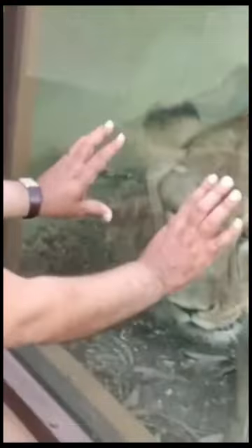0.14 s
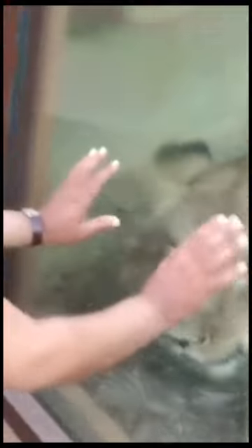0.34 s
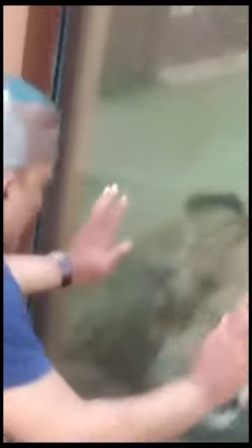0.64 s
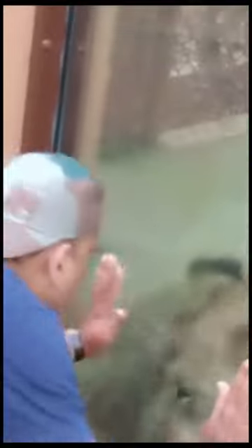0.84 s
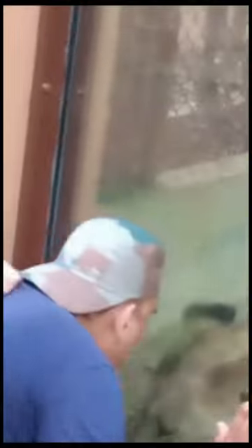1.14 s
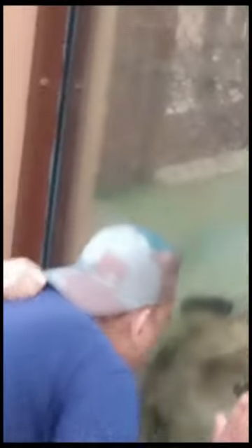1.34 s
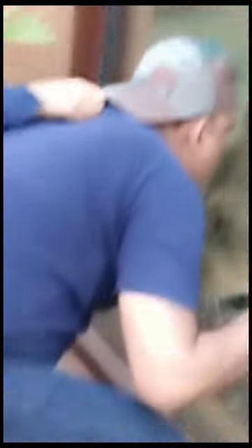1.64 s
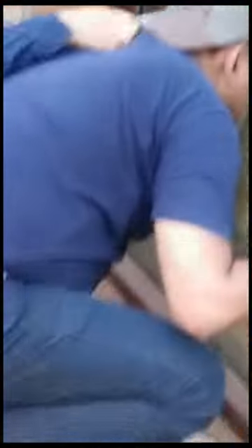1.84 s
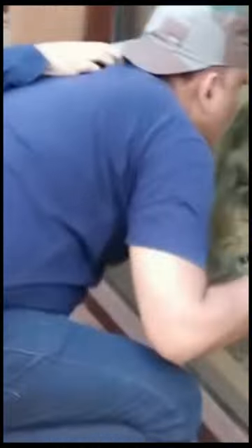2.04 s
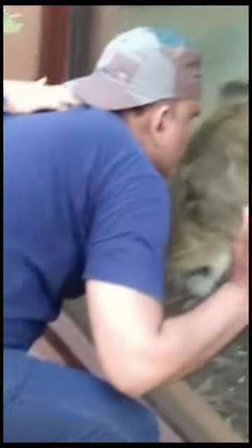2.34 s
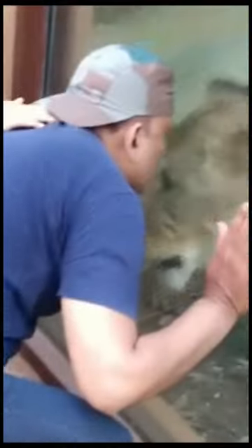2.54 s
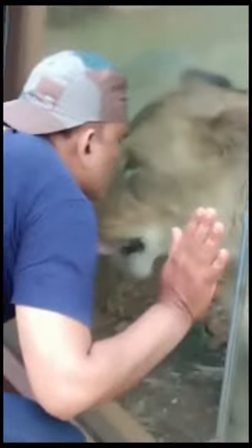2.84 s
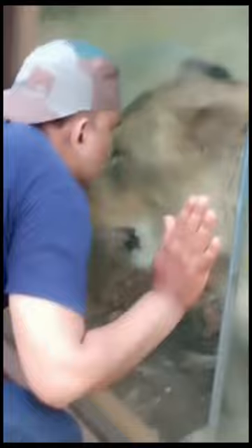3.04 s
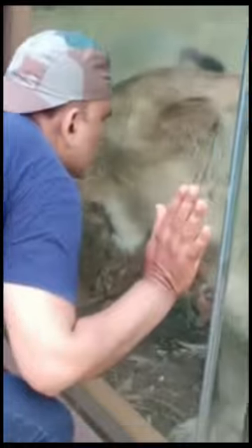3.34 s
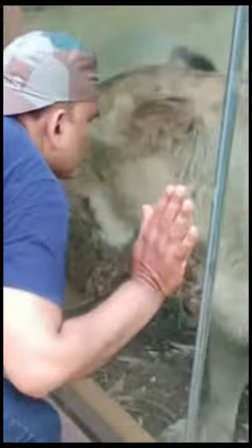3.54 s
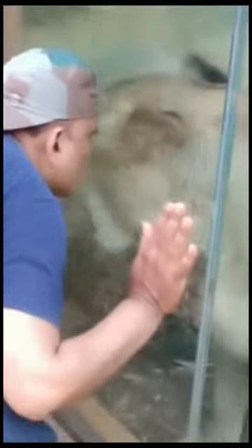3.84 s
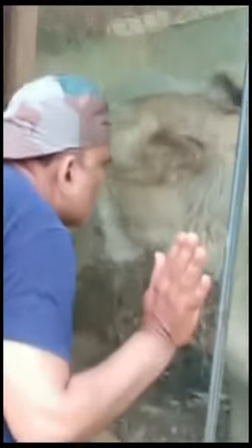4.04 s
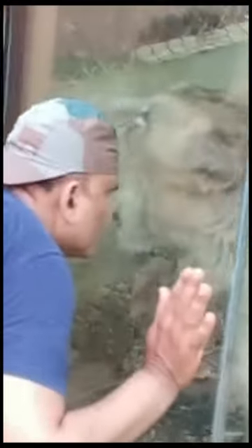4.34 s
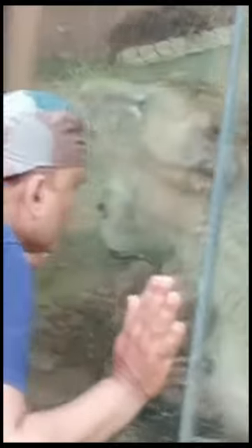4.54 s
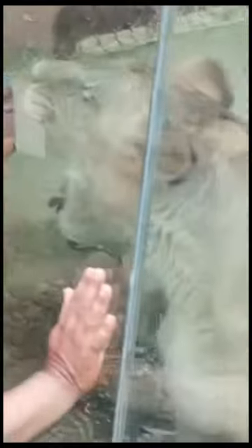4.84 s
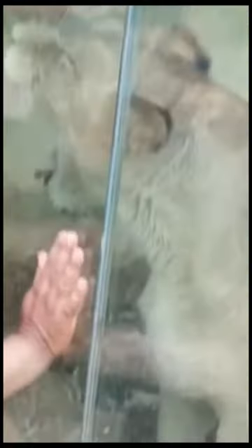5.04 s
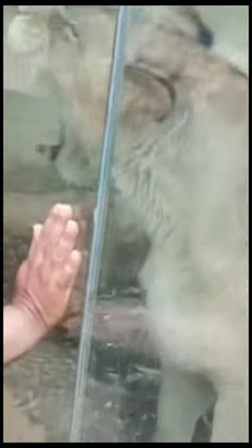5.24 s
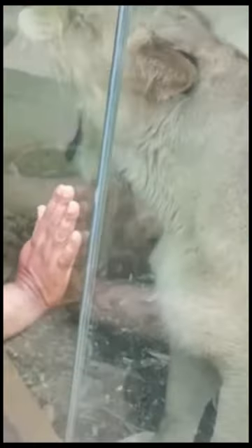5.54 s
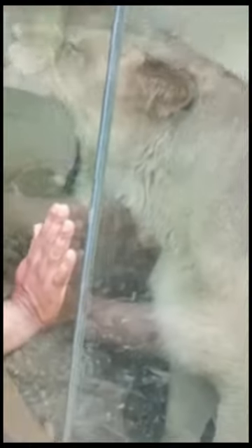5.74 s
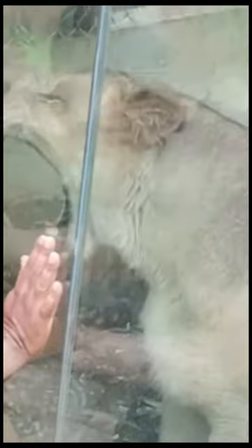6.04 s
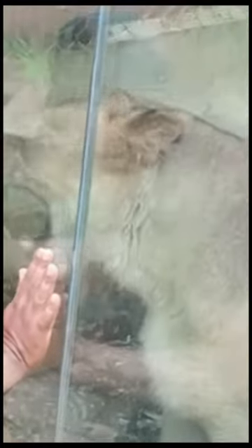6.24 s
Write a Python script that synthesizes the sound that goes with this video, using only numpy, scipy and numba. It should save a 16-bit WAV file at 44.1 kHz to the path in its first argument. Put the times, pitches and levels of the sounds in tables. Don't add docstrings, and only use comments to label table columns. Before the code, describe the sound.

A lion grunts loudly in steady rhythm, hooting then growling and gradually tiring, while birds chirp, a crow caws twice and the glass bumps softly.

```python
import sys
import numpy as np
from scipy import signal
from scipy.io import wavfile
from scipy.ndimage import uniform_filter1d
from numba import njit

SR = 44100
rng = np.random.default_rng(int(sys.argv[2]) if len(sys.argv) > 2 else 0)


def how_loud(loudness_db):
    steps = np.asarray(loudness_db, float) / 20
    return 10 ** steps


def transcribe(u):
    v = np.clip(np.atleast_2d(u).T, -1, 1)
    q = np.round(v * 32767).astype(np.int16)
    wavfile.write(sys.argv[1], SR, q)


N = 281799

# [start t/s, voice breaks t/s, folds stop t/s, shelter falls silent t/s, pitch f/Hz]
GRUNTS = [
    (-.1, .3, .5, .66, 158),
    (.825, 1.12, 1.349, 1.47, 155.5),
    (1.68, 1.96, 2.178, 2.37, 155),
    (2.605, 2.88, 3.083, 3.27, 155),
    (3.485, 3.631, 3.921, 4.1, 156),
    (4.315, 4.473, 4.69, 4.88, 150),
    (5.12, 5.284, 5.49, 5.68, 149.5),
    (5.935, 6.12, 6.3, 6.47, 150),
]
# [roughness 0-1, throat ring f/Hz, ring level/dB, starting share of the pitch]
BREAKS = [(0.499, 405.5, 1.5, 0.92), (0.501, 385, -1.5, 0.96), (.5, 388.6, 0, .94), (0.499, 386, 0, .92),
          (0.701, 383.4, 1.5, .91), (0.702, 374, -1.5, .91), (.7, 384, -1, .94), (.7, 375.4, 1.5, .94)]
# hoot level/dB [as the mouth opens, at full effort, at the break, as the folds stop], growl crest level/dB
EFFORT = [(-11.5, -2.5, -2, -24, -11.5), (-8, 1.5, -3.5, -25, -13.5), (-7.5, -0.5, -5, -22.5, -13),
          (-6.5, -2, -3.5, -24.5, -14), (-5.5, -6, -9, -24.5, -17.5), (-5, -5, -7, -27, -19.5),
          (-7, -5.5, -6.5, -26, -19.5), (-6, -6.5, -6.5, -26, -20.5)]
# [crest t/s, tires t/s, breath level/dB, share of the hoot's fall done halfway to the stop]
FLOW = [(-.04, 0.305, -34, .45), (1.007, 1.167, -35, 0.58), (1.831, 2.047, -36.5, 0.56),
        (2.745, 2.947, -36.5, 0.6), (3.641, 3.795, -39, .25), (4.464, 4.616, -41, .4),
        (5.274, 5.417, -40, .35), (6.074, 6.201, -40.5, 0.29)]
HUSH_S = .06


def unit(x):
    return x / np.sqrt(np.mean(x ** 2))


def play(tables, column, off):
    t = np.arange(N) / SR
    out = np.full(N, float(off))
    for rows in tables:
        rows = np.array(rows, float)
        on = (t >= rows[0, 0]) & (t <= rows[-1, 0])
        out[on] = np.interp(t[on], rows[:, 0], rows[:, column])
    return out


def gain(tables, column, size):
    return uniform_filter1d(how_loud(play(tables, column, -120)), size)


def walk(rate):
    k = int(SR / rate)
    held = np.repeat(rng.standard_normal(N // k + 1), k)
    return 1.3 * uniform_filter1d(uniform_filter1d(held, k), k)[:N]


def pair(x, pan_db):
    return x * how_loud(np.array([[.5], [-.5]]) * pan_db)


@njit
def svf(x, hz, width):
    y, b, l = np.empty(len(x)), 0., 0.
    g, k = np.tan(np.pi * hz / SR), width / hz
    for i in range(len(x)):
        v = (b + g * (x[i] - l)) / (1 + g * (g + k))
        b, l, y[i] = 2 * v - b, l + 2 * g * v, k * v
    return y


@njit
def glide(x, hz, width):
    y, b, l = np.empty(len(x)), 0., 0.
    for i in range(len(x)):
        g, k = np.pi * hz[i] / SR, width / hz[i]
        v = (b + g * (x[i] - l)) / (1 + g * (g + k))
        b, l, y[i] = 2 * v - b, l + 2 * g * v, k * v
    return y


def tract(x, modes):
    total = 0
    for k, (hz, width, db) in enumerate(modes):
        mode = svf(svf(x, 1. * hz, 1.88 * width), 1. * hz, 1.88 * width)
        total = total + (-1) ** k * how_loud(db) * mode
    return unit(total)


@njit
def folds(hz, rough, stretch, size):
    pulses, phase, p, k = np.zeros(len(hz) + 1), np.empty(len(hz)), 0., 0
    for i in range(len(hz)):
        step = hz[i] * np.exp(rough[i] * stretch[k]) / SR
        p += step
        if p >= 1:
            p, k = p - 1, k + 1
            a = np.exp(rough[i] * size[k])
            pulses[i] += a * p / step
            pulses[i + 1] += a * (1 - p / step)
        phase[i] = p
    return pulses[:-1], phase


def air():
    # [f/Hz, level/dB per Hz]
    colour = [(12, -37), (20, -16), (90, -15.5), (160, -0.5), (231, -26), (391, -22.5), (565, -28),
              (884, -24.5), (1420, -32), (4640, -36), (10800, -45), (14000, -77), (22000, -120)]
    # [f/Hz, level/dB]; machine hum at 65 Hz, the shelter's low note and the pane's note ringing
    steady_tones = [(65, -48.5), (156, -55), (760, -67.5)]
    hiss, swell = 0, walk(0.2)
    f, d = np.transpose(colour)
    for hz in 25 * 2 ** np.arange(0, 8.8, .5):
        mid, side = (svf(svf(rng.standard_normal(N), hz, hz / 2), hz, hz / 2) for _ in range(2))
        db = np.interp(np.log(hz), np.log(f), d) + 0.45 * swell + 1.4 * walk(3.8)
        spread = .6 if hz < 3000 else .9 if hz < 6000 else .25
        hiss = hiss + how_loud(db) * (mid + spread * side * np.array([[1], [-1]]))
    t = np.arange(N) / SR
    hum = sum(how_loud(db + 3 * walk(6)) * np.sin(2 * np.pi * hz * t) for hz, db in steady_tones)
    return unit(hiss) * how_loud(-42) + hum


def notes(rows, bend, flutter):
    edge_db = (-5.5, 0, 0, 0, -5.5)
    return [[(s + u * length, a + c * (b - a), db + e, flutter)
             for u, c, e in zip(np.linspace(0, 1, 5), bend, edge_db)] for s, length, a, b, db in rows]


def birds():
    # [t/s, length/s, from f/Hz, to f/Hz, level/dB]; thin straight glides
    glides = [(.44, .03, 3100, 4550, -56), (.555, 0.049, 3220, 3927, -57.5), (.84, .035, 4240, 3400, -56.5),
              (1.46, .04, 2420, 2400, -59.5), (2.28, .035, 3450, 4500, -58), (4.875, .09, 5400, 4550, -53),
              (5.272, 0.035, 5800, 3500, -48.5), (5.31, .04, 3500, 4645, -52.5),
              (5.7, .025, 6400, 6930, -56.5), (5.812, 0.048, 3280, 4200, -57),
              (6.19, .025, 4080, 3920, -54), (6.352, .04, 5800, 5110, -59)]
    arches = [
        (4.7, .03, 3580, 4300, -56.5),
        (4.83, 0.032, 5790, 6830, -59),
        (5.71, .068, 3340, 4550, -54),
        (6.32, .032, 5900, 6780, -57.5),
    ]
    trills = [(.475, .075, 4396, 4490, -56.5), (.915, .03, 5350, 5240, -49.5),
              (1.4, .03, 2950, 2608, -58.5), (2.312, .11, 4500, 4610, -54.5),
              (4.245, .055, 4740, 4300, -55.5), (4.73, .08, 3470, 2996, -55), (5.14, .04, 4556, 4080, -59),
              (5.93, .03, 4000, 4800, -54), (5.96, .1, 4780, 4780, -59), (6.24, .06, 3316, 2870, -55)]
    line = np.linspace(0, 1, 5)
    thin, blurred = .01, .05
    song = notes(glides, line, thin) + notes(arches, np.abs(np.sin(np.pi * line)) ** .5, thin)
    song = song + notes(trills, line, blurred)
    hz = play(song, 1, 4000) * (1 + play(song, 3, 0) * walk(400))
    whistle = np.sqrt(2) * np.sin(2 * np.pi * np.cumsum(hz) / SR)
    whistle = whistle * how_loud(2.5 * walk(120)) * gain(song, 2, size=200)
    echoes = 0.26 * np.roll(whistle, 330) + 0.22 * np.roll(whistle, 710) + 0.12 * np.roll(whistle, 1270)
    return 1.1 * whistle + echoes


def crow():
    # [t/s, length/s, pitch f/Hz, level/dB]
    calls = [
        (3.287, .31, 409.8, -46.5),
        (3.917, .34, 411, -46),
    ]
    # [f/Hz, width/Hz, level/dB]
    beak = [(1220, 230, 0), (1630, 300, -4.5), (1990, 260, 0), (2820, 280, -7), (6450, 1700, -13.5)]
    edge_db = -12.5
    caws = [[(s, .94 * f, db + edge_db), (s + .3 * d, f, db), (s + .73 * d, 1.01 * f, db),
             (s + d, .86 * f, db + edge_db)] for s, d, f, db in calls]
    chance = rng.standard_normal((N // 50, 2)).T
    pulses, phase = folds(play(caws, 1, 400), np.full(N, .3), .14 * chance[0], chance[1])
    hiss = rng.standard_normal(N) * np.exp(-phase / .4)
    return tract(unit(pulses) + 2.0 * hiss, beak) * how_loud(2.5 * walk(30)) * gain(caws, 2, size=441)


def bumps():
    # [t/s, peak level/dB, f/Hz]
    knocks = [
        (4.272, -34.5, 254),
        (5.07, -31.5, 263.9),
    ]
    t = np.arange(N) / SR
    total = 0
    for s, db, hz in knocks:
        decay = (t > s) * np.exp(-np.abs(t - s) / 0.0156)
        total = total + how_loud(db) * decay * np.sin(2 * np.pi * hz * (t - s))
    return total


@njit
def walls(x, lags, keep, damp):
    line, soft, out = np.zeros((8, 4096)), np.zeros(8), np.zeros((2, len(x)))
    for i in range(len(x)):
        total = 0.
        for k in range(8):
            soft[k] += (1 - damp) * (keep[k] * line[k, (i - lags[k]) & 4095] - soft[k])
            total += soft[k]
            out[k % 2, i] += soft[k]
        for k in range(8):
            line[k, i & 4095] = x[i] + soft[k] - total / 4
    return out


def room(x):
    t60_s = 0.45
    lags = rng.integers(500, 2600, 8)
    return how_loud(-11) * walls(x, lags, how_loud(-60 * lags / SR / t60_s), 0.34)


def pane(growl):
    freed = np.clip((np.arange(N) / SR - 3.2) / 1.5, 0, 1)
    glass = how_loud(10) * svf(growl, 765., 10.) * freed
    return glass + svf(growl, 317.6, 7.)


def arc(crest_db, late, open_db, tire_db, stop_db):
    curves = []
    for (s, _, b, _, _), (top, tired, _, _), db in zip(GRUNTS, FLOW, crest_db):
        curves.append([(s, db - 45), (s + 0.047, db + open_db), (top + late * (tired - top), db),
                       (tired, db + tire_db), (.5 * (tired + b), db + 0.69 * stop_db),
                       (b, db + stop_db), (b + 0.093, db + stop_db - 21.5)])
    return gain(curves, 1, size=800)


def hoot_shape():
    # [t/s, depth level/dB]
    catches = [(0.325, 8), (.385, 21.5), (.445, 9), (.502, 8), (.612, 10), (1.15, 8.5), (1.21, 6),
               (1.27, 5.5), (1.99, 5.5), (2.156, 7), (2.746, 8.5), (2.892, 6), (2.998, 21), (3.644, 10),
               (3.78, -2), (3.831, 10), (3.905, 14), (4.488, 12.5), (4.548, 1.5), (4.593, 3), (4.685, 16),
               (4.73, 8), (5.318, 4.5), (5.46, 11), (5.547, 9), (6.13, 6.5), (6.189, 18), (6.217, 6),
               (6.31, 7)]
    swell_s, open_s, tight_s = .03, 0.077, .12
    voice_pan_db, stop_pan_db, ring_pan_db = 6.5, 4.5, -10.5
    pitch, level, side = [], [], []
    for (s, a, b, end, f), (opened, full, broke, stop, _), (rough, _, _, low), (_, tired, _, fall) in zip(
            GRUNTS, EFFORT, BREAKS, FLOW):
        note = f + .6 * (155.6 - f)
        sagged = f * (1 - .1 * rough ** 2)
        pitch.append([(s, f * low), (s + swell_s, f * low), (s + tight_s, f), (tired, f),
                      (tired + .045, sagged), (b, note), (end + HUSH_S, note)])
        level.append([(s, opened - 45), (s + swell_s, opened - 14), (s + open_s, opened),
                      ((s + open_s + a) / 2, full), (a, broke), ((a + b) / 2, broke + fall * (stop - broke)),
                      (b, stop), (end, stop - 11.5), (end + HUSH_S, stop - 35)])
        side.append([(s, voice_pan_db), (b - .13, voice_pan_db), (b, stop_pan_db), (end + HUSH_S, ring_pan_db)])
    t = np.arange(N) / SR
    dips = sum(db * np.exp(-((t - s) / .014) ** 2) for s, db in catches)
    hz = uniform_filter1d(play(pitch, 1, 150), size=882)
    return hz, gain(level, 1, size=400) * how_loud(-dips), play(side, 1, 0)


def fold_shape():
    # t/s, roughness, throat ring f/Hz, ring level/dB, pitch share
    shape = []
    for (s, a, b, end, _), (r, f, db, _) in zip(GRUNTS, BREAKS):
        shape.append([(s, .06, f, db - 21.5, .96), (s + .04, .06, f, db - 8, .96), (s + .11, .17, f, db, 1.0),
                      (a - .045, .3, f, db, 1.0), (a - .015, r, f, db, 1.0), (b, r, .95 * f, db - 13.0, .9),
                      (b + 0.032, .1, f, db - 18.5, .9), (end + HUSH_S, .1, f, db - 24, .9)])
    return play(shape, 1, 0), play(shape, 2, 260), play(shape, 3, 0), play(shape, 4, 1)


def hoot_voice(hz, share, rough, pulses):
    # [f/Hz, width/Hz, level/dB]
    chest = [(66.4, 33.4, -3), (116.6, 27.8, 1.5), (191.5, 54, -11)]
    sway = share ** .12 + 0.015 * rough * walk(45)
    tone = np.sqrt(2) * np.sin(2 * np.pi * np.cumsum(hz * sway) / SR) * how_loud(1.5 * rough * walk(70))
    return tone + rough ** 2 * tract(pulses, chest)


def growl_voice(pulses, phase, rough, ring_hz, ring_db):
    # [f/Hz, width/Hz, level/dB]
    throat = [(68.6, 120, -15), (118, 34, 1.5), (208.4, 39, 7), (348, 79, -3.5), (459, 180, -2),
              (548.6, 153, -3.5), (774.6, 28, -13), (1044, 107, -19)]
    rasp = rng.standard_normal(N) * (.08 + rough) * (.6 + np.exp(-phase / .5))
    ring = unit(glide(glide(rng.standard_normal(N), ring_hz, 40.), ring_hz, 40.))
    growl = tract(unit(pulses) + 0.86 * rasp, throat) + how_loud(ring_db) * ring
    crest_db = np.array(EFFORT)[:, 4]
    return growl * how_loud(-4.5) * arc(crest_db, late=.1, open_db=-6.5, tire_db=-6.5, stop_db=-27.5)


def breath_voice(phase):
    # [f/Hz, width/Hz, level/dB]
    mouth = [(1170, 230, 3.5), (2244, 466, -4), (3210, 560, -14.5), (4300, 540, -15.5), (5460, 610, -14),
             (7670, 1100, -20), (10600, 1000, -31.5)]
    gate = (1.4 + np.exp(-phase / 0.32)) * how_loud(1.3 * walk(25))
    hiss = np.array([tract(gate * rng.standard_normal(N), mouth) for _ in range(3)])
    breath = (hiss[0] + 0.75 * hiss[1:]) * how_loud(-1.0)
    return breath * arc(np.array(FLOW)[:, 2], late=.4, open_db=-9, tire_db=-5.5, stop_db=-24.5)


def lion():
    hz, loud, pan_db = hoot_shape()
    rough, ring_hz, ring_db, share = fold_shape()
    chance = rng.standard_normal((N // 50, 2)).T
    pulses, phase = folds(hz * share, rough, .16 * chance[0], .35 * chance[1])
    hoot = pair(hoot_voice(hz, share, rough, pulses) * loud, pan_db)
    return hoot, growl_voice(pulses, phase, rough, ring_hz, ring_db), breath_voice(phase)


def scene():
    hoot, growl, breath = lion()
    outside = birds() + crow()
    reverb = room(growl + breath[0] + 1.6 * outside)
    shelter = growl + pane(growl) + bumps() + reverb
    return hoot + pair(shelter, 5.4) + pair(breath, 6.5) + pair(outside, 0.3) + pair(air(), 0.7)


def band_limit(x):
    return signal.sosfilt(signal.butter(12, 15800, fs=SR, output="sos"), x)


def record(dry):
    cut = signal.sosfilt(signal.ellip(10, .2, 75, 10900, fs=SR, output="sos"), dry)
    return band_limit(np.clip(cut, -.995, .995))


dry = scene()
out = record(dry)
transcribe(out)
```